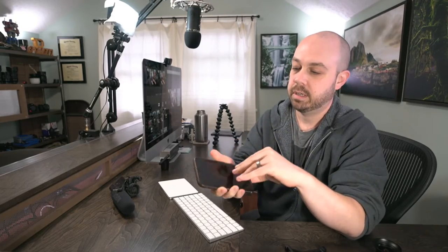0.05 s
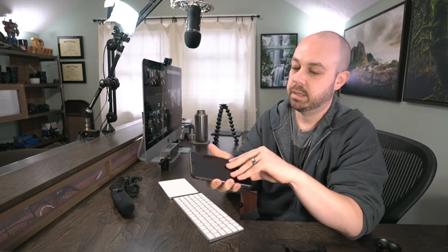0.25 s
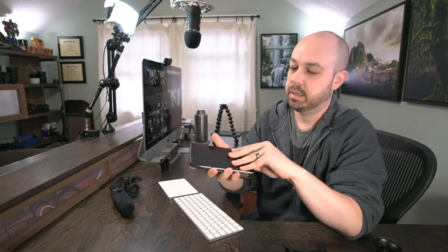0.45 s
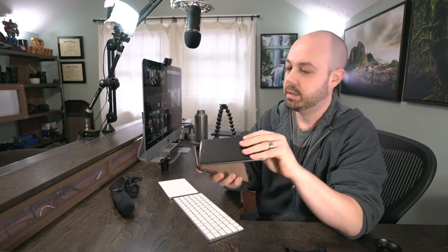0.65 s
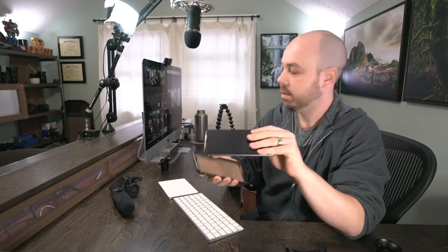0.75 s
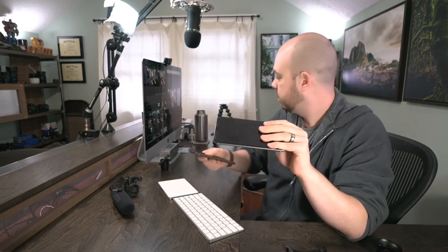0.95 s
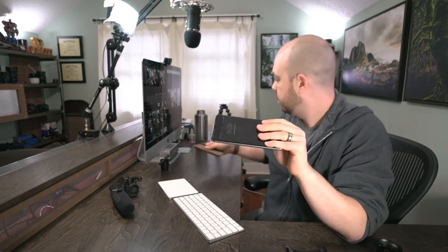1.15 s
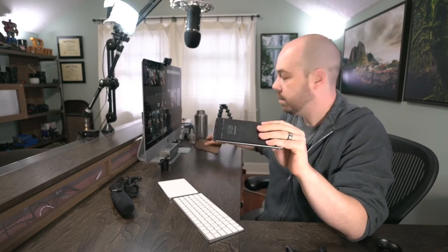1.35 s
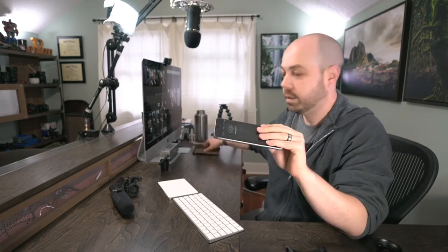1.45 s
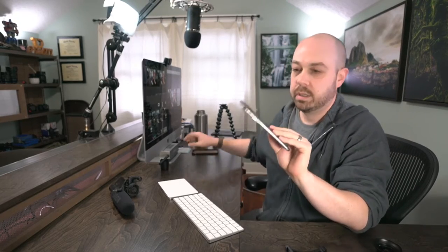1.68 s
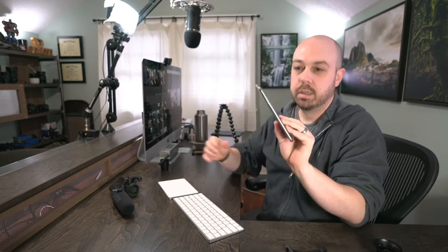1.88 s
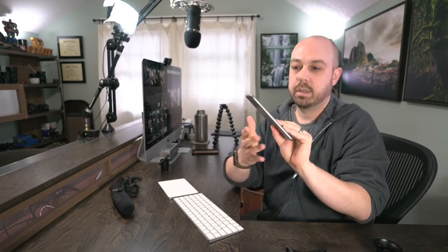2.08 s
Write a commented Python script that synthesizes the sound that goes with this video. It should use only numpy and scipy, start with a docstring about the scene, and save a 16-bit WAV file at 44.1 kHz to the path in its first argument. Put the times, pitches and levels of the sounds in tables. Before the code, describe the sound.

A phone is worked out of a leather case, close by, with faint jerky creaks until 0.25 seconds, then soft sliding and small snaps around 0.5. A sleeve swishes, with a soft bump near 1.1. At 1.4 the case lands on a wooden desk in two quick slaps, the loudest moment. Near 1.9 the phone clicks twice with low thumps. The small room has a faint steady hush.

```python
"""Phone out of a leather case

A phone is eased out of its case: the leather rubs, creaks and snaps off its corners. A sleeve swishes
as the arm reaches away, the empty case lands on a wooden desk, edge first and then flat, and the phone
clicks twice in the hand. A small room answers, over a faint steady hush."""
import sys
import numpy as np
from scipy import signal
from scipy.fft import rfft, irfft, next_fast_len
from scipy.io import wavfile
from scipy.ndimage import uniform_filter1d, map_coordinates

SR = 44100
rng = np.random.default_rng(int(sys.argv[2]) if len(sys.argv) > 2 else 0)


def file_out(sig):
    """Save sig as 16-bit WAV at sys.argv[1]."""
    # one column per channel
    cols = np.atleast_2d(sig).T
    # limit, then scale
    lim = np.clip(cols, -1, 1)
    pcm = np.round(lim * 32767).astype(np.int16)
    wavfile.write(sys.argv[1], SR, pcm)


N = 93447
T = np.arange(N) / SR
BAND_LIMIT_HZ = 16100

# phone clicking in the hand: start_s, click_db, thump_db
CLICKS = [(1.8638, -28, -18), (1.928, -22.5, -11)]


def case_landing():
    """Each contact rings the hollow case, slaps the leather and thuds in the desk; the room answers."""
    # case on desk: start_s, body_db, slap_db, thud_db, t60_s, cutoff_hz
    contacts = [(1.3798, -15.5, -24, -36, 0.022, 2460), (1.3949, -13, -9, -20, 0.0095, 12900),
                (1.3962, -0.5, -16, -16, 0.0088, 7500), (1.402, -15, -19, -23.5, 0.012, 4000),
                (1.4794, -33, -19, -34, 0.0055, 15000), (1.4815, -16, 1.5, -14.5, 0.011, 12800),
                (1.4833, -19.5, -7, -16.5, 0.025, 6960), (1.4883, -22, -13, -20, .01, 13000),
                (1.4964, -30, -12.5, -13, 0.0093, 12100)]
    # hollow case: mode_hz, level_db, t60_s
    case_modes = [(275, -13, .05), (413, -12, 0.039), (615, -20, 0.053), (762, -14, 0.036),
                  (1048, -1.5, 0.025), (1153, -4.5, 0.023), (1394, -2, 0.019), (1660, -6, 0.023),
                  (1937, 0.5, 0.013), (2275, 3, 0.01), (3020, -7.5, 0.013), (3760, -11, 0.0069),
                  (5300, -11, 0.0022), (7150, -0.5, 0.0021)]
    # leather slap: freq_hz, level_db
    slap_spectrum = [(100, -16), (280, -19.5), (400, -2.5), (560, -9.5), (800, -8.5), (1020, -1),
                     (1200, 2.5), (1360, 7.5), (1580, -7), (1950, 3), (2300, -4), (2900, 3), (3300, -2),
                     (3850, 2.5), (4200, -5.5), (4700, -6.5), (6000, -12), (7000, -11.5), (9500, -13.5),
                     (11200, -13), (14000, -18.5), (16000, -21)]
    # desk thud: freq_hz, level_db
    thud_spectrum = [(25, -2), (60, -9), (165, 3.5), (215, -4), (320, -1), (600, 2), (1500, -29),
                     (5000, -64)]
    slap, thud = colour(slap_spectrum), colour(thud_spectrum)
    t = T[:len(slap)]
    ring = norm(sum((-1) ** k * amp(db - 60 * t / t60_s) * np.sin(2 * np.pi * hz * t)
                    for k, (hz, db, t60_s) in enumerate(case_modes)))
    out = np.zeros(N)
    for start_s, body_db, slap_db, thud_db, t60_s, cutoff_hz in contacts:
        responses = (amp(body_db) * ring, amp(slap_db) * slap, amp(thud_db) * thud)
        blow = sum(convolve(contact(t60_s, cutoff_hz), response) for response in responses)
        add(out, start_s, blow)
        add(out, start_s, room(blow, wet_db=-4))
    return out


def leather_slips():
    """Leather rubs under the fingers and slips on the phone in jerks, each a tick and a creak."""
    # jerks: start_s, creak_db, tick_db
    slips = [(0.071, -28, -61), (0.0869, -34, -60), (0.0962, -31, -61), (0.109, -27.5, -56),
             (0.1449, -24.5, -53), (.1495, -23.5, -36), (0.2041, -24, -32), (0.2224, -26, -43),
             (.234, -35.5, -55)]
    # leather creak: freq_hz, level_db
    creak_spectrum = [(80, 1), (350, 5.5), (700, 5), (1150, -17.5), (1650, 4.5), (1950, 3), (2300, -10),
                      (3000, -26.5), (6500, -31), (15000, -59)]
    # slip tick: freq_hz, level_db
    tick_spectrum = [(500, -11), (2500, 5), (4500, 0), (6700, -13), (8400, 2.5), (10000, 0.5), (11000, -4),
                     (12300, -10), (14000, -19), (16000, -15)]
    # finger rub: time_s, level_db
    grip_envelope = [(0, -66), (.06, -77), (.1, -60), (.16, -76), (.19, -74), (.24, -56), (.28, -91),
                     (.33, -99)]
    creak_lag_s, creak_t60_s, tick_t60_s = 0.001194, 0.013, 0.0063
    creaks = strikes([(s + creak_lag_s, db, creak_t60_s) for s, db, _ in slips], creak_spectrum)
    ticks = strikes([(s, db, tick_t60_s) for s, _, db in slips], tick_spectrum)
    return creaks + ticks + friction(grip_envelope, creak_spectrum, grain_db=3, grain_hz=180)


def phone_slide():
    """The phone slides out; the lining brushes it, with a last flick as they part."""
    # sliding: time_s, level_db
    slide_envelope = [(.27, -95), (.32, -63), (.365, -58), (.41, -72), (.445, -76), (.47, -58.5),
                      (.53, -67), (.57, -73), (.66, -90)]
    # sliding: freq_hz, level_db
    slide_spectrum = [(200, -34.5), (1100, -11), (1600, 7.5), (1900, 5), (2600, -18.5), (3800, -15),
                      (6500, -22.5), (9500, -18.5), (15000, -29.5)]
    # lining brush: time_s, level_db
    lining_envelope = [(.28, -84), (.35, -72), (.41, -74), (.44, -82), (.52, -66), (.56, -70), (.598, -74),
                       (.608, -58.5), (.62, -74), (.67, -92)]
    # lining brush: freq_hz, level_db
    lining_spectrum = [(2000, -12), (6500, -8), (9000, 3.5), (11500, -0.5), (13500, -0.5), (16000, -6)]
    slide = friction(slide_envelope, slide_spectrum, grain_db=1, grain_hz=300)
    lining = friction(lining_envelope, lining_spectrum, grain_db=3.5, grain_hz=600)
    return slide + lining


def rim_snaps():
    """The rim of the case snaps off the phone."""
    # rim letting go: start_s, level_db, t60_s, cutoff_hz
    snaps = [(.4555, -24.5, 0.0096, 10000), (.4932, -31.5, 0.0043, 2160), (.4988, -28.5, 0.013, 2400),
             (.5215, -41, 0.0088, 4000), (.6085, -41, 0.014, 1480), (.838, -39.5, 0.04, 1990)]
    # rim snap: freq_hz, level_db
    snap_spectrum = [(200, -10), (1120, -21), (1500, 2), (1750, -2), (1950, -2.5), (2350, 1.5), (2750, -14),
                     (3300, -3.5), (4100, -6), (4700, -9), (5400, -5), (6500, -21.5), (8700, -17),
                     (15000, -24)]
    return strikes(snaps, snap_spectrum)


def phone_clicks():
    """A brief, bright contact: the sharp part of each click."""
    # phone click: freq_hz, level_db
    click_spectrum = [(200, -8), (1200, 0), (2100, -1), (2900, 3.5), (3400, 0), (4400, 4.5), (5400, -4.5),
                      (6500, -13), (9000, -19), (12000, -17.5), (16000, -17)]
    t60_s = 0.0045
    return strikes([(start_s, db, t60_s) for start_s, db, _ in CLICKS], click_spectrum)


def click_thumps():
    """Under each click, a thump that falls quickly in pitch."""
    top_hz, end_hz, sweep_s, t60_s = 315, 62, 0.0032, 0.087
    out = np.zeros(N)
    for start_s, _, thump_db in CLICKS:
        t = np.maximum(T - start_s, 0)
        cycles = end_hz * t + (top_hz - end_hz) * sweep_s * (1 - np.exp(-t / sweep_s))
        out -= amp(thump_db) * norm(np.sin(2 * np.pi * cycles) * amp(-60 * t / t60_s))
    return out


def arm():
    """The sleeve swishes; hand and arm bump softly."""
    # skin and sleeve: time_s, level_db
    swish_envelope = [(.3, -85), (.55, -71), (.68, -74), (.76, -67), (.85, -63), (.98, -63), (1.11, -60.5),
                      (1.2, -68.5), (1.35, -73), (1.8, -70.5), (1.97, -68), (2.11, -73)]
    # sleeve swish: freq_hz, level_db
    swish_spectrum = [(200, 19), (1200, 2), (2500, 3.5), (5000, -2), (9000, 1), (12000, 1), (15500, -8)]
    # hand and arm: start_s, level_db, t60_s
    bumps = [(.6078, -21, .016), (1.113, -23, 0.13), (1.15, -27, 0.032), (2.022, -31.5, 0.049),
             (2.093, -27, 0.027)]
    # soft bump: freq_hz, level_db
    bump_spectrum = [(25, -11), (70, -4), (130, -5), (300, -15), (800, -26.5), (2500, -37), (9000, -70)]
    swish = friction(swish_envelope, swish_spectrum, grain_db=1, grain_hz=150)
    return swish + strikes(bumps, bump_spectrum)


def room(x, wet_db):
    """Small-room reverb: a diffuse tail that builds quickly and dies sooner in the high treble."""
    # room decay: freq_hz, t60_s
    decay_times = [(100, 0.37), (400, 0.35), (1500, 0.4), (4000, 0.37), (9000, 0.35), (15000, 0.28)]
    # room colour: freq_hz, level_db
    tail_spectrum = [(90, -4), (160, 1), (400, 4), (1200, -2), (4000, -3), (9000, -0.5), (15000, 1)]
    build_s, mean_t60_s = 0.0043, np.mean(decay_times, axis=0)[1]
    t = T[:16384]
    build_up = 1 - np.exp(-(t / build_s) ** 2)
    tail = whiten(rng.standard_normal(len(t)) * amp(-60 * t / mean_t60_s) * build_up, smooth_bins=25)
    hz, frame_s, bands = signal.stft(tail, SR, nperseg=256)
    extra_loss_db = 60 * frame_s * (1 / log_interp(decay_times, hz)[:, None] - 1 / mean_t60_s)
    bands = bands * amp(log_interp(tail_spectrum, hz)[:, None] - extra_loss_db)
    response = norm(signal.istft(bands, SR, nperseg=256)[1])
    return amp(wet_db) * convolve(x, response)


def hush(rms_db=-59):
    """Steady room noise."""
    # room noise: freq_hz, level_db
    hush_spectrum = [(15, -48), (25, -14), (99, -1), (344, -6), (503, -11), (591, -9), (714, -14),
                     (887, -13), (962, -15), (1740, -17), (5140, -33), (14000, -40), (16000, -42)]
    return amp(rms_db) * np.sqrt(N) * norm(convolve(rng.standard_normal(N), colour(hush_spectrum)))


def contact(t60_s, cutoff_hz=BAND_LIMIT_HZ):
    """A noise burst, the scrunch of tiny impacts; softer contacts have less treble."""
    t = T[:4096]
    envelope = amp(-60 * (t / t60_s) ** 1.57)  # exponent > 1: holds, then fades
    burst = whiten(rng.standard_normal(len(t)) * envelope, smooth_bins=13)
    lowpass = signal.butter(2, min(cutoff_hz, BAND_LIMIT_HZ), fs=SR)
    return norm(signal.lfilter(*lowpass, burst))


def strikes(rows, spectrum):
    """Contacts (start_s, level_db, t60_s, optional cutoff_hz) coloured by a spectrum."""
    response, out = colour(spectrum), np.zeros(N)
    for start_s, level_db, *shape in rows:
        add(out, start_s, amp(level_db) * convolve(contact(*shape), response))
    return out


def friction(envelope, spectrum, grain_db, grain_hz):
    """Grainy rubbing noise that follows a level envelope."""
    noise = rng.standard_normal(N)
    knots = rng.standard_normal(int(N * grain_hz / SR) + 4)
    grains = noise * amp(grain_db * map_coordinates(knots, [T * grain_hz]))
    rub = np.sqrt(N) * norm(convolve(grains, colour(spectrum)))
    return rub * amp(np.interp(T, *np.transpose(envelope)))


def colour(spectrum):
    """Unit-energy impulse response of (freq_hz, level_db) points."""
    hz = np.fft.rfftfreq(16384, 1 / SR)
    return norm(minimum_phase(amp(log_interp(spectrum, hz))))


def whiten(burst, smooth_bins):
    """Flatten a burst's spectrum, keeping its decay."""
    power = uniform_filter1d(np.abs(rfft(burst)) ** 2, size=smooth_bins)
    return convolve(burst, minimum_phase(1 / np.sqrt(np.abs(power) + 1e-9)))[:len(burst)]


def minimum_phase(gain):
    """The promptest impulse response with this gain."""
    cepstrum = irfft(np.log(np.maximum(gain, 1e-6)))
    half = len(cepstrum) // 2
    cepstrum[1:half] *= 2
    cepstrum[half + 1:] = 0
    return irfft(np.exp(rfft(cepstrum)))[:half]


def log_interp(points, hz):
    """Interpolate (freq_hz, value) points on a log frequency axis."""
    freq_hz, values = np.transpose(points)
    return np.interp(np.log(hz + 1), np.log(freq_hz + 1), values)


def amp(db):
    """Decibels to gain."""
    return 10 ** (np.asarray(db) / 20)


def norm(x):
    """Scale to unit energy."""
    return x / np.sqrt(np.sum(x ** 2) + 1e-20)


def convolve(x, response):
    """Pass a sound through an impulse response."""
    return signal.fftconvolve(x, response)[:N]


def add(out, start_s, sound):
    """Mix a sound in at start_s."""
    span = out[round(start_s * SR):][:len(sound)]
    span += sound[:len(span)]


def scene():
    """Hands close by, clicks nearly dry; the case lands farther off, with more room."""
    handling = leather_slips() + phone_slide() + rim_snaps() + arm()
    clicks = phone_clicks()
    reverb = room(handling + amp(-5) * clicks, wet_db=-10)
    return (handling + clicks + reverb + case_landing() + click_thumps() + hush())[None]


def record(dry):
    """Steep low-pass at the band limit."""
    n_fft = next_fast_len(N + SR)
    hz = np.fft.rfftfreq(n_fft, 1 / SR)
    lowpass = 1 / np.sqrt(1 + (hz / BAND_LIMIT_HZ) ** 200)
    return irfft(rfft(dry, n_fft) * lowpass, n_fft)[:, :N]


dry = scene()
out = record(dry)
file_out(out)
```